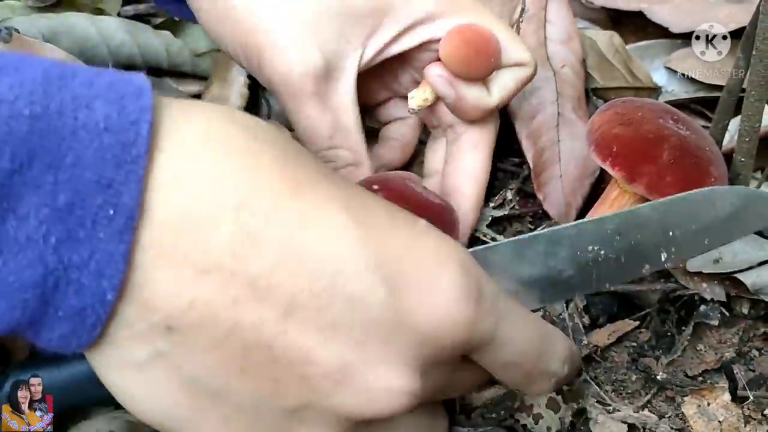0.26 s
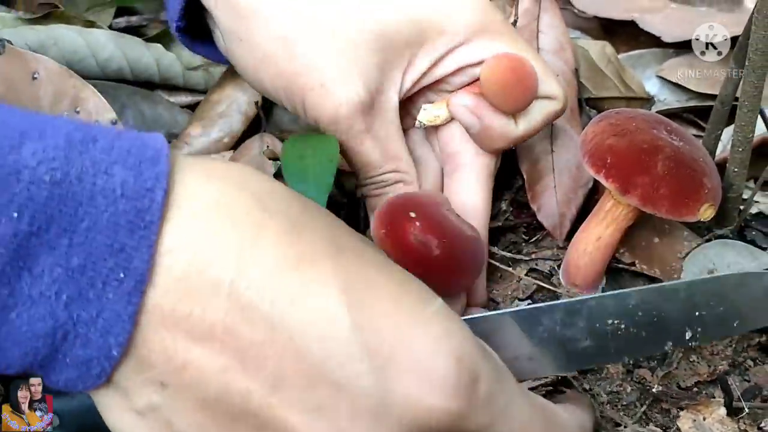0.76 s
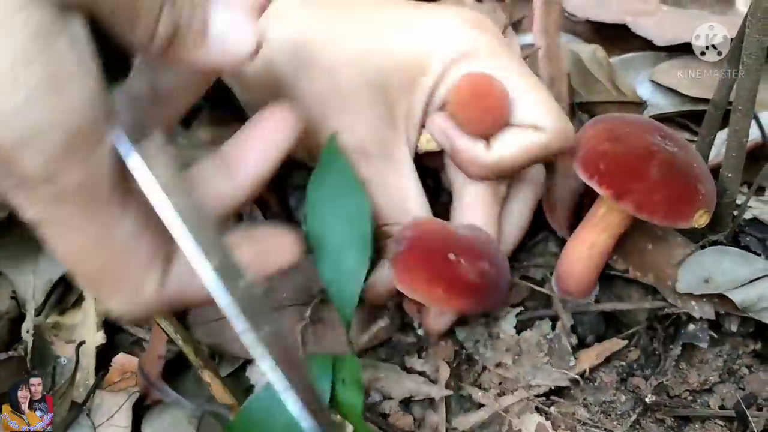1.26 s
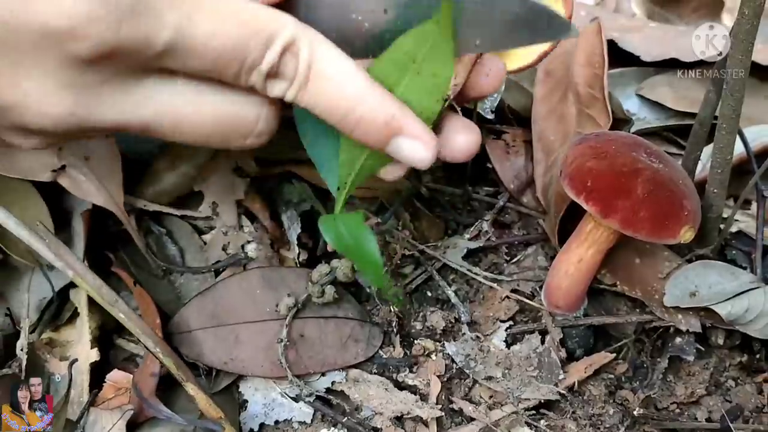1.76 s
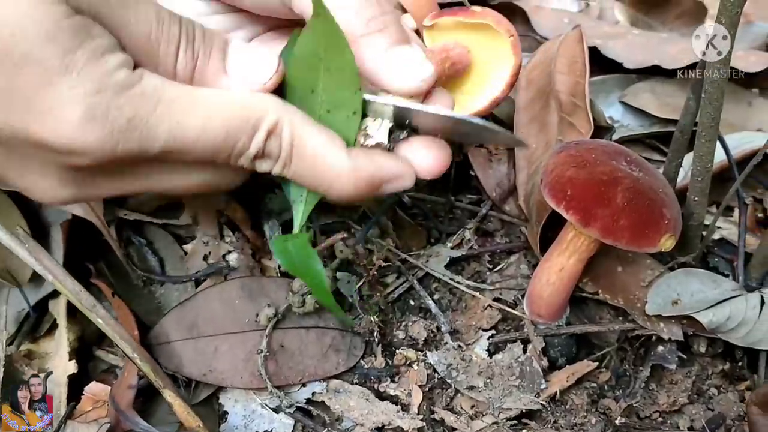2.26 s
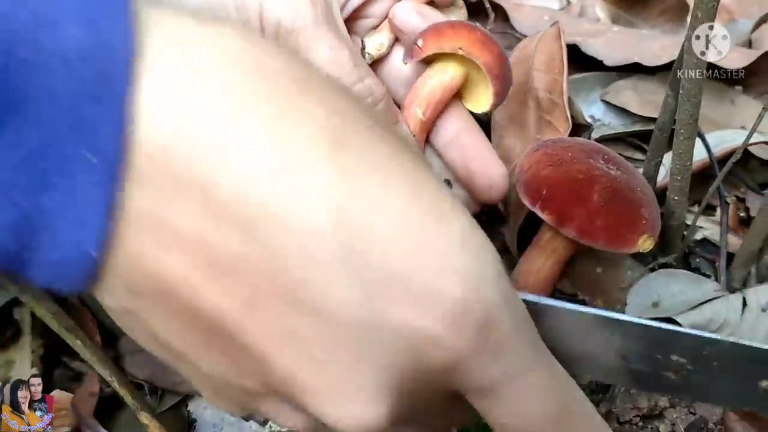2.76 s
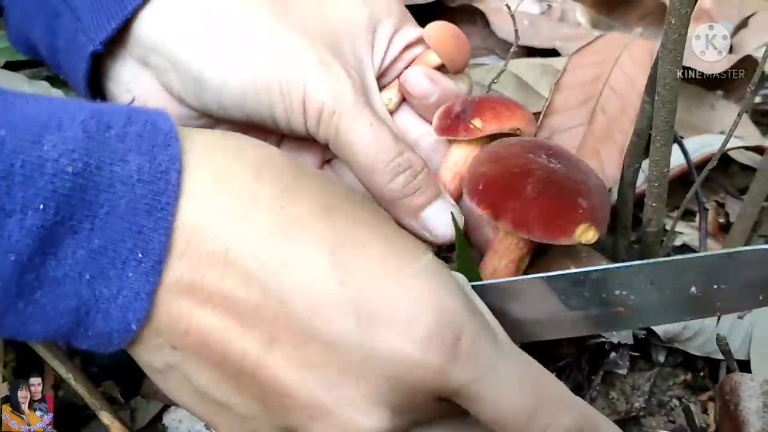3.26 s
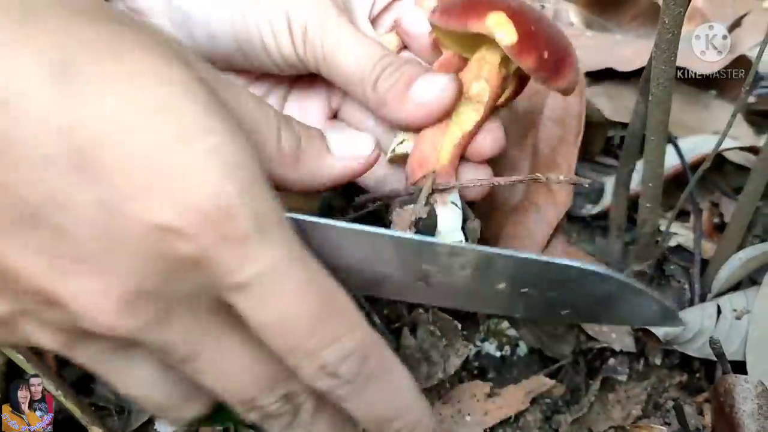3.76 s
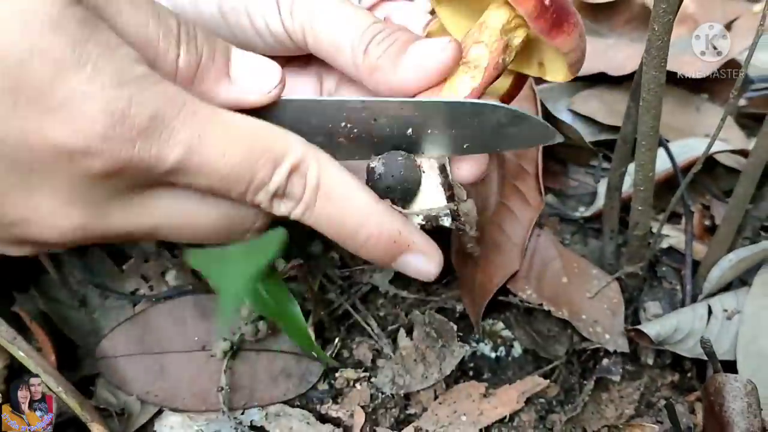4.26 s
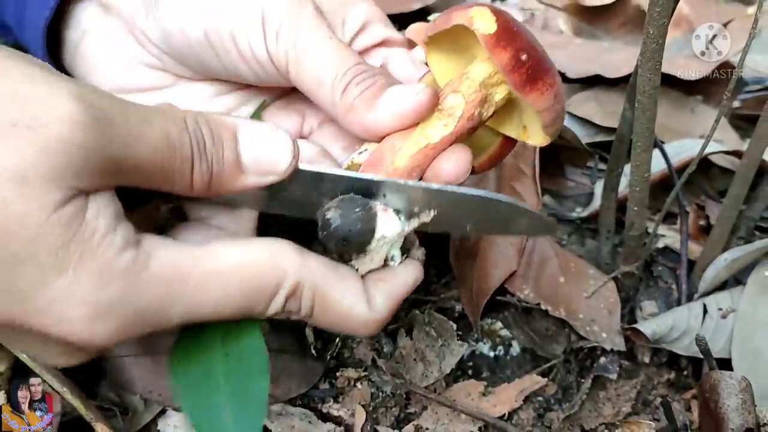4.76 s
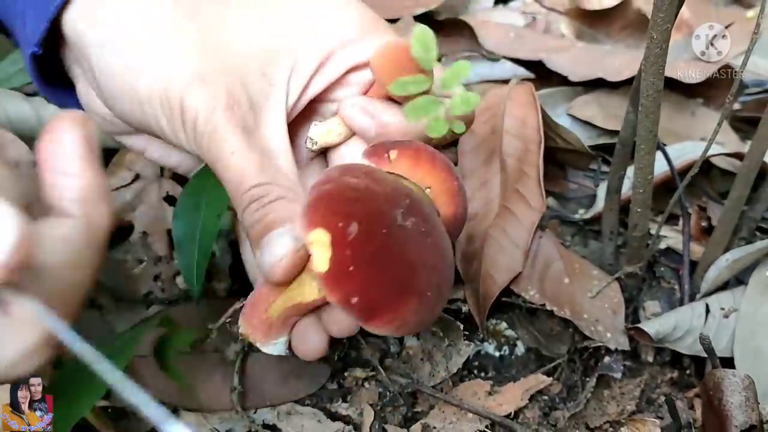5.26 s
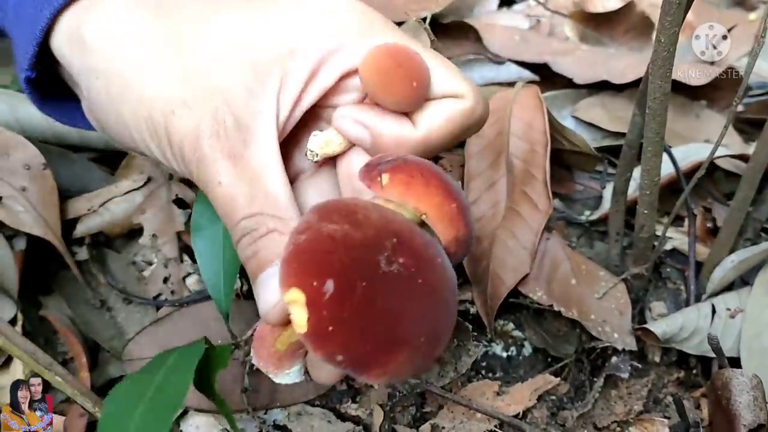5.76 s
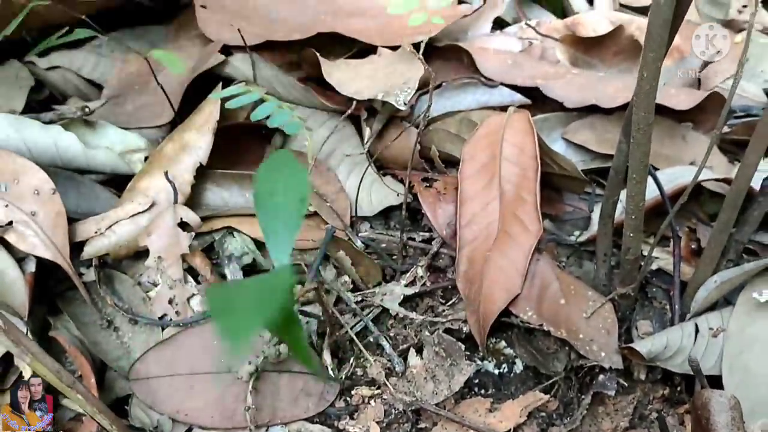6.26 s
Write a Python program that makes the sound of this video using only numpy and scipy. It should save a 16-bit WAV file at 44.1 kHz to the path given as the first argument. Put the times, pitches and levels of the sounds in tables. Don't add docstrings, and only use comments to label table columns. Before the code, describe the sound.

Very close stereo sound of hands and a knife working in dry forest litter. Irregular rustles, short scraping drags, brittle leaf cracks, stem ticks and small dull knocks come in busy clusters with short lulls. A bird whistles midway through the first half, echoing among the trunks. Soft forest hush and a narrow, high insect hiss continue behind, left exposed at the end.

```python
import sys
import numpy as np
from scipy import signal
from scipy.fft import rfft, irfft, dct
from scipy.io import wavfile
from scipy.ndimage import uniform_filter1d

SR = 44100
rng = np.random.default_rng(int(sys.argv[2]) if len(sys.argv) > 2 else 0)


def wav_out(sig):
    wavfile.write(sys.argv[1], SR, np.round(np.clip(np.atleast_2d(sig).T, -1, 1) * 32767).astype(np.int16))


def undo_db(level):
    steps = np.asarray(level, float) / 20
    return 10 ** steps


N = 286650
COARSE_S = np.arange(0, N, 16) / SR
SNAP_PEAK = 150


def time_curves(rows):
    s, *columns = np.transpose(rows)
    return [np.interp(np.arange(N) / SR, s, c) for c in columns]


def at_hz(points, hz):
    point_hz, level_db = np.transpose(points)
    return np.interp(np.log(hz), np.log(point_hz), level_db)


def rms_one(x):
    return x / np.sqrt(np.mean(x ** 2) + 1e-20)


def drift(rate_hz):
    r = np.exp(-32 * np.pi * rate_hz / SR)
    white = rng.standard_normal(N // 16 + 2002)
    slow = signal.lfilter([1], [1, -2 * r, r * r], white)[2000:]
    return np.interp(np.arange(N) / 16, np.arange(len(slow)), rms_one(slow))


def later(x, s):
    return np.interp(np.arange(N) - s * SR, np.arange(N), x, left=0)


def band(x, low_hz, high_hz):
    sos = signal.butter(2, [low_hz, min(high_hz, SR / 2.2)], "band", fs=SR, output="sos")
    return signal.sosfilt(sos, x)


# (frequency [Hz], left-right [dB])
PORT_TILT = [(60, -1), (110, 3), (200, 1), (380, 7.5), (700, -2), (1290, 0), (2380, -1.5), (4400, -4),
             (8120, -0.5), (15000, 8)]


def port_gains(hz):
    tilt = at_hz(PORT_TILT, hz) / 2
    return undo_db([[tilt], [-tilt]])


# (frequency [Hz], density [dB per Hz])
HUSH_SPECTRUM = [(12, -37), (20, 2.5), (55, -1.5), (116, -17), (172, -2), (301, -18.5), (1220, -16),
                 (2080, -7.5), (3160, -20.5), (4540, -12), (6180, -47), (6720, -19), (8180, -22),
                 (13900, -30.5), (16000, -61)]
HUSH_DB = -59.5


def forest_hush():
    edges = 20 * 2 ** (np.arange(20) / 2)
    white = rng.standard_normal((2, 2, N))
    out = 0
    for k, (low, high) in enumerate(zip(edges, edges[1:])):
        hz = np.sqrt(low * high)
        gain = undo_db(at_hz(HUSH_SPECTRUM, hz) + drift(9))
        out = out + band(white[k % 2], low, high) * gain * port_gains(hz)
    return undo_db(HUSH_DB) * rms_one(out)


# (time [s], level [dB])
CHORUS_LEVEL = [(0.0, -54.5), (0.7, -57.5), (1.27, -49.5), (2.03, -56), (3.24, -52), (3.95, -51),
                (4.29, -57), (4.98, -52.5), (5.25, -54.5), (6.5, -56)]


def insects(low_hz, high_hz):
    hiss = band(rng.standard_normal((2, N)), low_hz, high_hz)
    hiss = band(hiss, low_hz / 1.12, high_hz * 1.1)
    shimmer_db = 1.0 * drift(27) + 1.1 * drift(2.4)
    sides_db = np.array([[.5], [3.]])
    return rms_one(hiss) * undo_db(time_curves(CHORUS_LEVEL)[0] + shimmer_db + sides_db)


# (time [s], delay of the right port [ms])
HAND_PLACE = [(0, .48), (.5, .32), (1.4, .34), (1.7, .54), (2.6, .54), (2.85, .3), (3.9, .33), (4.3, .16),
              (4.9, .16), (5.2, .37), (6.5, .5)]


def port_lag_s():
    return time_curves(HAND_PLACE)[0] / 1000


# (frequency [Hz], density [dB per Hz])
LEAF_SPECTRUM = [(29, -49), (50, -16.5), (282, -10.5), (375, -9.5), (1050, -3), (1440, -7.5), (2110, 2.5),
                 (2890, -1.5), (3950, 4), (4780, -2.5), (5660, 0), (8110, -15), (14100, -22), (15500, -34)]


def colour_db(hz, thud_db, crisp_db):
    low = np.clip(np.log2(1800 / hz), 0, 1)
    high = np.clip(3 * np.log2(hz / 6500), 0, 1)
    return at_hz(LEAF_SPECTRUM, hz) + low * thud_db + high * crisp_db


# (time [s], rustle level [dB])
RUSTLE_LEVEL = [(0, -54.5), (.12, -53), (.47, -46), (.56, -52.5), (.9, -51), (1.21, -48), (1.39, -49.5),
                (1.7, -52.5), (2.19, -60.5), (2.46, -47.5), (3.3, -49.5), (3.66, -49.5), (4.1, -46.5),
                (4.29, -68.5), (5.0, -62.5), (5.67, -58.5), (5.97, -60), (6.5, -56.5)]
RUSTLE_THUD_DB, RUSTLE_CRISP_DB = -12, -12


def rustle_power(hz):
    busy = undo_db(2 * np.interp(COARSE_S, *np.transpose(RUSTLE_LEVEL)))
    return busy * undo_db(2 * colour_db(hz, RUSTLE_THUD_DB + 14.5, RUSTLE_CRISP_DB + 16.5))


# (start [s], length [s], level [dB], relative thud [dB], relative crispness [dB])
DRAG_STROKES = [(.01, 0.055, -47, -21, -5.5), (1.032, 0.03, -39, -19.5, -2.5),
                (1.089, 0.087, -44, -13.5, -3.5), (1.405, 0.185, -42, -14, -9.5),
                (3.198, 0.11, -46, -15.5, -14), (3.468, 0.028, -51, -3.5, -26),
                (3.846, 0.055, -44.5, -10, -5), (4.012, 0.067, -49, -21, -8),
                (4.338, 0.03, -51, -17.5, -17), (5.157, 0.217, -47.5, -12, -8.5),
                (5.274, 0.022, -42.5, -10.5, -18), (5.38, 0.021, -41.5, -15.5, -7),
                (5.432, 0.012, -41, -17.5, -2), (5.464, 0.088, -47, -15, -9), (5.607, 0.02, -55, -8, -7),
                (0.823, 0.028, -45, -28, -6.5), (5.072, .1, -57.5, -19, -9), (1.34, 0.016, -50.5, -6, -3),
                (0.99, 0.006, -43.5, -21, -1), (3.894, 0.037, -45, -17, -9.5),
                (5.567, 0.021, -36.5, -16, -12.5), (5.995, 0.2, -55.5, -28, -5.5),
                (2.466, .025, -38, -20, -11), (4.85, .05, -60, -29, -2), (3.7, .04, -51.5, -20, -12),
                (2.93, 0.084, -55, -27, -2.5), (4.71, .04, -57.5, -25, -8)]
STROKE_ATTACK_S, STROKE_RELEASE_S = 0.0052, 0.028


def stroke_power(hz):
    start, length, level_db, thud_db, crisp_db = np.transpose(DRAG_STROKES)
    since = COARSE_S - start[:, None]
    rise = np.clip(since / STROKE_ATTACK_S, 0, 1)
    after = np.clip(since - length[:, None], 0, 1)
    dragging = (rise * np.exp(-after / STROKE_RELEASE_S)) ** 2
    return undo_db(2 * (level_db + colour_db(hz, thud_db + 17.5, crisp_db + 14))) @ dragging


# (start [s], length [s], level [dB])
HAND_RESTS = [(.2, .035, -3), (0.448, .01, -7.5), (0.499, 0.027, -3), (0.592, .018, -7), (.745, .04, -4.5),
              (0.794, 0.018, -4), (.865, .02, -6), (.982, 0.016, -5), (1.018, .015, -8), (1.595, .005, -10),
              (1.605, 0.048, -5.5), (1.424, .01, -5), (1.5, .015, -4), (.905, .045, -4), (2.495, .025, -4),
              (1.675, .02, -5), (2.092, 0.075, -4), (2.876, 0.018, -5), (3.446, .028, -5),
              (3.632, 0.06, -7), (4.432, 0.21, -6), (5.364, 0.013, -6), (5.647, .03, -6), (5.7, .04, -3.5)]
REST_EDGE_S = 0.0046


def rests():
    e = REST_EDGE_S / 2
    total_db = 0
    for s, length, db in HAND_RESTS:
        corners = [s - e, s + e, s + e + length, s + 3 * e + length]
        total_db = total_db + np.interp(COARSE_S, corners, [0, db, db, 0])
    return undo_db(2 * total_db)


# (time [s], frequency [Hz])
LITTER_RING = [(0, 4030), (.9, 3940), (1.1, 3630), (1.35, 4350), (1.47, 3020), (1.58, 4320), (2.3, 4260),
               (3.0, 3800), (3.3, 3660), (3.9, 4200), (4.2, 4070), (5.1, 2760), (5.45, 2420), (5.65, 2570),
               (6.0, 4050)]
LITTER_DB, LITTER_OCTAVES = 3, .4


def litter_db(hz):
    centre = np.log2(time_curves(LITTER_RING)[0])
    near = np.exp(-((np.log2(hz) - centre) / LITTER_OCTAVES) ** 2)
    return LITTER_DB * (near - .4)


# (time [s], peak level [dB], ringing [Hz], left-right [dB])
SOIL_KNOCKS = [(0.2906, -28.5, 4700, 5.5), (0.3737, -25, 3880, 0), (0.4589, -24, 3770, -5),
               (0.614, -35, 1480, -3), (0.6593, -32, 4500, 0), (0.737, -24, 3220, -5),
               (0.8474, -28, 3400, -5), (0.9587, -29, 1640, -7), (1.0325, -22, 3200, 8),
               (1.411, -21.5, 2290, -4.5), (1.5911, -28, 3920, 10), (2.2015, -28, 4940, -9),
               (2.47, -20, 4320, 0), (3.85, -31, 2580, 2.5), (3.2069, -31, 3880, -16),
               (3.411, -32, 2000, -8), (3.4806, -34, 3170, -9), (3.488, -28, 3120, -8.5),
               (3.9433, -33, 3720, 9), (4.049, -34.5, 5630, 9.5), (4.366, -39, 4670, 4),
               (5.2225, -29.5, 3800, 0), (5.297, -30, 3470, 0.5), (5.447, -30.5, 2470, -2),
               (5.4938, -31.5, 2430, -4)]
LEAF_CRACKS = [(0.249, -30, 3320, 0), (0.3685, -27, 3280, -1), (0.443, -23.5, 4040, -2),
               (0.706, -43, 4300, -9), (0.976, -33, 3930, -7.5), (1.05, -31.5, 3660, -8),
               (1.156, -27, 2130, 1.5), (2.247, -34, 4970, -4), (1.602, -19.5, 4370, -2),
               (1.666, -27.5, 4500, -2), (1.997, -30, 4100, -4), (2.0413, -29, 3800, -6.5),
               (2.1978, -27, 4200, -4.5), (2.3033, -27, 4870, 0), (2.399, -29.5, 5700, -5),
               (2.4659, -12.5, 4640, -5.5), (1.965, -37.5, 4540, -3), (2.338, -38, 5500, -10),
               (2.989, -33.5, 4640, -10), (3.106, -25, 4760, -10.5), (3.545, -28, 3840, -14.5),
               (3.616, -29.5, 4540, -10.5), (4.1127, -34.5, 5570, -6), (4.734, -37.5, 5650, -10),
               (4.976, -36, 2480, -6.5), (5.1165, -36.5, 4230, -4), (5.392, -31, 2600, -6),
               (5.5751, -18.5, 1720, -8), (5.854, -37, 6300, -7), (0.547, -41, 4470, -13)]
STEM_TICKS = [(.789, -25.5, 3740, -12.5), (.8583, -30.5, 2790, -2), (0.893, -22.5, 3940, -0.5),
              (1.013, -37.5, 4220, 16), (1.067, -31, 3670, 5), (1.4199, -19.5, 4530, -1),
              (1.4386, -31, 3400, -8), (1.4643, -23.5, 3600, 2), (1.477, -24, 3600, -10.5),
              (1.5566, -33, 4100, 8), (2.4735, -24.5, 4850, 1), (2.4845, -23, 4050, -24.5),
              (2.8701, -17, 4300, -3), (3.233, -36.5, 4120, -17), (3.2913, -28, 3500, -5.5),
              (3.695, -30, 4170, -12), (3.9076, -29, 4350, 4), (5.406, -15, 2990, -6.5),
              (5.5785, -17, 2140, -1.5), (5.586, -34, 4150, 16), (5.61, -34, 4370, -11),
              (5.6775, -29, 2500, -6.5), (6.199, -52, 3470, -3), (3.519, -14.5, 3240, -4),
              (5.695, -23.5, 3350, -6), (3.279, -29.5, 4100, 1), (3.912, -31, 3630, -13),
              (4.889, -41, 3060, -11), (1.921, -31.5, 5650, -0.5), (2.271, -36, 3600, 4.5)]
SMALL_SPLINTERS = [(0.012, -31.5, 3630, 8), (0.0364, -30, 3800, -4), (0.045, -29.5, 3600, 1),
                   (0.0732, -33, 4360, -1), (0.2833, -33.5, 3390, -2), (0.642, -43, 4400, 0),
                   (0.6582, -31.5, 5020, -6), (1.0047, -27.5, 3800, 1), (1.257, -32, 5500, -3),
                   (1.3522, -32, 4500, -3.5), (1.441, -26.5, 3670, 1), (1.52, -30, 5070, 2),
                   (1.564, -28.5, 5400, -5), (1.5724, -27.5, 3660, 2.5), (1.7215, -37, 3800, 7),
                   (2.1686, -43, 3630, 2), (2.185, -34.5, 5600, 1), (2.884, -35.5, 3160, -3),
                   (2.9444, -35.5, 4570, -7), (3.4769, -28.5, 3270, -3), (3.579, -37.5, 4570, -8),
                   (3.89, -34, 4620, 2), (4.109, -35, 3820, -2), (4.9824, -37.5, 4060, -2),
                   (5.2807, -33, 2210, -2), (5.291, -30.5, 3210, -2.5), (5.4144, -30.5, 2430, -0.5),
                   (5.6214, -34, 2370, 0.0), (5.6345, -31.5, 4360, 4.5), (6.3274, -48, 4570, 4),
                   (6.4686, -46, 4370, -3), (2.0768, -38.5, 4500, -1), (2.2793, -38, 5500, 0),
                   (2.3166, -40, 5000, 0), (2.9699, -34, 4000, -5), (3.0219, -36, 4000, -5),
                   (3.0573, -35.5, 4460, -5), (3.5324, -33, 4000, -5), (3.749, -34, 3000, 0),
                   (4.342, -43, 4500, 1), (1.055, -29, 3000, 1), (1.127, -31, 4200, 0),
                   (1.916, -36, 5500, 0), (2.058, -40.5, 5000, 0), (2.456, -31.5, 5200, 1),
                   (5.9798, -41, 4500, -1), (2.006, -40, 4500, 1)]
# (relative thud [dB], relative crispness [dB])
KIND_COLOURS = [
    (-26, -13.5),
    (-34.5, -9.5),
    (-32, -22),
    (-35.5, -15),
]


def snaps():
    kinds = [SOIL_KNOCKS, LEAF_CRACKS, STEM_TICKS, SMALL_SPLINTERS]
    rows = [(*row, *colour) for events, colour in zip(kinds, KIND_COLOURS) for row in events]
    return np.transpose(rows)


def bursts(count, rise_s, fall_s, crack, tail_db, tail_s):
    t = (np.arange(640) - SNAP_PEAK) / SR
    noise = rng.standard_normal((count, 2, len(t)))
    dying = np.exp(-t / fall_s) + undo_db(tail_db) * np.exp(-t / tail_s)
    shape = np.where(t < 0, np.exp(t / rise_s), dying)
    snap = noise * shape + crack * (t == 0) * np.sign(noise)
    lines = rfft(snap)
    power = uniform_filter1d(abs(lines) ** 2, size=15, axis=2)
    snap = irfft(lines / np.sqrt(power), len(t))
    return snap / np.sqrt(np.sum(snap ** 2, axis=2, keepdims=True))


def snap_gains(hz, peak_db, ring_hz, thud_db, crisp_db, ring_db, uneven_db):
    level_db = colour_db(hz, thud_db[:, None] + 32.5, crisp_db[:, None] + 21.5)
    level_db = level_db + ring_db * np.exp(-(np.log2(hz / ring_hz[:, None]) / 0.47) ** 2)
    gain = undo_db(level_db + uneven_db * rng.standard_normal(level_db.shape))
    middle = np.sum(gain ** 2 * hz * (hz > 1500) * (hz < 7500), axis=1) / SR
    return gain * (undo_db(peak_db) / np.sqrt(middle))[:, None]


def grains(per_s, spread_db):
    sizes = undo_db(spread_db * np.minimum(rng.exponential(1, N), 5)) * rng.choice([-1, 1], N)
    return rms_one(sizes * (rng.random(N) < per_s / SR))


def leaves(alike, snap_db, ring_db, uneven_db):
    resting, lag_s = rests(), port_lag_s()
    clumps = undo_db(1.2 * drift(35) + 2.8 * drift(200))
    cracks = np.array([grains(1600 * clumps, spread_db=2.2) for _ in range(2)])
    brush = rng.standard_normal((2, 2, N)) * rms_one(clumps)
    edges = 79 * 2 ** (np.arange(24) / 3)
    hz = np.sqrt(edges[1:] * edges[:-1])
    s, peak_db, ring_hz, pan_db, thud_db, crisp_db = snaps()
    splinters = bursts(len(s), rise_s=.0009, fall_s=.0015, crack=2.8, tail_db=-21, tail_s=.005)
    snap = snap_gains(hz, peak_db + snap_db, ring_hz, thud_db, crisp_db, ring_db, uneven_db)
    at = (s * SR).astype(int) - SNAP_PEAK
    lean = undo_db(np.array([pan_db + 4, -pan_db - 4]) / 2)
    patches, flicker = drift(20), drift(80)
    out = np.zeros((2, N))
    for k, (low, high) in enumerate(zip(edges, edges[1:])):
        patch_db = 2.6 * np.roll(patches, 12011 * k) + 2.8 * np.roll(flicker, 12007 * k)
        patch_db += litter_db(hz[k])
        power = (rustle_power(hz[k]) + stroke_power(hz[k])) * resting
        gain = np.interp(np.arange(N) / SR, COARSE_S, np.sqrt(power)) * undo_db(9 + patch_db)
        left, scattered = gain * (.65 * cracks + .6 * brush[k % 2])
        right = left.copy()
        for i, g, (to_left, to_right), (first, second) in zip(at, snap[:, k], lean.T, splinters):
            span = slice(i, i + len(first))
            left[span] += g * to_left * first
            right[span] += g * to_right * first
            scattered[span] += g * to_right * second
        same = np.clip(alike + 0.27 * np.log2(1000 / hz[k]), .1, .99)
        right = later(same * right + np.sqrt(1 - same ** 2) * scattered, lag_s)
        there = band([left, right], low, high)
        out += band(there[:, ::-1], low, high)[:, ::-1] * port_gains(hz[k])
    return out


# (time [s], peak level [dB], frequency [Hz], left-right [dB])
DULL_KNOCKS = [(0.02, -34.5, 900, -7.5), (0.087, -42.5, 815, 5), (0.192, -50, 736, -1),
               (0.281, -39.5, 670, 5), (0.295, -31, 1110, -5), (0.372, -39, 594, -1), (0.411, -42, 895, 9),
               (0.475, -41, 500, -1), (0.552, -42, 674, 1), (0.607, -41, 1100, 1), (0.656, -41.5, 583, -1),
               (0.733, -41, 1110, -6), (0.842, -40.5, 830, -8.5), (0.955, -40, 720, 3),
               (1.03, -25.5, 1210, 14.5), (1.165, -36.5, 1040, 2), (1.276, -39, 422, -1),
               (1.395, -45, 606, 1.0), (1.409, -36, 604, 2), (1.419, -28.5, 1120, 14),
               (1.589, -31.5, 1090, 19), (1.969, -51, 1020, 14), (2.039, -51.5, 394, 9),
               (2.076, -45, 824, 14), (2.2, -42, 845, 18), (2.301, -41, 904, -8), (2.463, -34.5, 637, 10),
               (2.491, -37.5, 446, 0.5), (2.525, -32, 795, 6.5), (2.472, -46, 110, 2),
               (2.748, -45, 1130, -14), (2.798, -46.5, 590, 4), (2.869, -30, 1000, 6),
               (3.206, -36.5, 620, 3), (3.303, -44, 840, -1), (3.409, -33.5, 1130, 12),
               (3.435, -46, 420, -1), (3.475, -40, 760, -5), (3.485, -32.5, 980, 13),
               (3.518, -28.5, 756, 1.5), (3.73, -48, 630, 4), (3.745, -39, 1150, -9), (3.843, -30, 690, 1),
               (3.86, -40, 1140, -2), (3.905, -45, 1020, 2.0), (4.091, -46.5, 420, 5), (5.228, -43, 802, 0),
               (5.294, -32, 765, -8), (5.576, -52, 308, -1), (5.693, -40, 1080, -16)]
THUD_DB, THUD_CYCLES, THUD_RISE_S, THUD_ROUGH = -1.0, 4.14, .0006, .4


def thuds():
    out = np.zeros((2, N + SR))
    t = np.arange(1300) / SR
    lag_s = port_lag_s()
    chances = rng.random((len(DULL_KNOCKS), 2))
    for (s, db, hz, pan_db), (turn, ratio) in zip(DULL_KNOCKS, chances):
        i = int(s * SR)
        for side, lean_db in enumerate([pan_db / 2, -pan_db / 2]):
            late = np.maximum(t - side * lag_s[i], 0)
            rough = np.sin(2 * np.pi * (hz * (0.94 + ratio) * late + turn))
            tone = np.sin(2 * np.pi * hz * late) + THUD_ROUGH * rough
            dying = undo_db(-60 * late * hz / (3 * THUD_CYCLES))
            shape = (1 - np.exp(-late / THUD_RISE_S)) * dying
            out[side, i:i + len(t)] += undo_db(db + THUD_DB + 4 + lean_db) * shape * tone
    return out[:, :N]


# (time [s], frequency [Hz], level [dB])
BIRD_NOTES = [
    [(2.365, 1874, -72), (2.379, 1986, -45), (2.45, 2035, -44), (2.49, 2040, -47)],
    [(2.408, 2500, -49), (2.424, 2620, -43), (2.46, 2780, -43)],
    [(2.558, 3420, -48.5), (2.567, 3374, -39.5), (2.589, 3335, -36.5), (2.607, 2960, -36.5),
     (2.619, 2905, -39.5), (2.637, 3690, -36), (2.651, 3950, -37), (2.681, 3394, -40.5), (2.69, 3286, -51)],
    [(2.695, 2560, -46), (2.722, 2530, -45.5), (2.745, 2530, -53)],
    [(2.385, 1018, -71), (2.46, 1014, -66)],
]
# (time [s], frequency [Hz], level [dB])
DEEP_CHIRP = [
    (5.05, 2155, -55),
    (5.075, 2350, -53),
    (5.1, 2950, -52),
    (5.135, 3100, -52),
    (5.18, 3115, -57),
]
# (time [s], frequency [Hz], level [dB])
FAR_PIPS = [
    (4.57, 2040, -57),
    (4.617, 2010, -55),
    (4.712, 2090, -53.5),
]
CHIRP_FLUTTER_DB, CHIRP_WET_DB = 3, 3
BIRD_LAG_S = 0.00043


def birds(echo_db, echo_t60_s):
    t, song, flutter = np.arange(N) / SR, np.zeros(N), drift(60)
    pips = [[(s, hz * 1.05, db), (s + 0.013, hz * .94, db - 7.5)] for s, hz, db in FAR_PIPS]
    for note in [*BIRD_NOTES, *pips]:
        hz, level_db = time_curves(note)
        edge = np.clip(np.minimum(t - note[0][0], note[-1][0] - t) / 0.0053 + .5, 0, 1)
        loudness = np.sqrt(2) * undo_db(level_db + 1.2 * flutter) * edge
        song += loudness * np.sin(2 * np.pi * np.cumsum(hz) / SR)
    hz, level_db = time_curves(DEEP_CHIRP)
    sounding = (t > DEEP_CHIRP[0][0]) * (t < DEEP_CHIRP[-1][0])
    loudness = undo_db(level_db + CHIRP_FLUTTER_DB * flutter) * sounding
    chirp = loudness * np.sin(2 * np.pi * np.cumsum(hz) / SR)
    wet = song + undo_db(CHIRP_WET_DB) * chirp
    song = song + chirp
    lag = t[:SR // 2]
    trunks = rng.standard_normal((2, len(lag))) * undo_db(-60 * lag / echo_t60_s) * (lag > .008)
    trunks = trunks / np.sqrt(np.sum(trunks ** 2) / 2)
    echoes = signal.fftconvolve(wet[None], trunks, axes=1)[:, :N]
    direct = np.array([undo_db(-10.0) * song, undo_db(5.5) * later(song, BIRD_LAG_S)])
    return direct + undo_db(echo_db) * echoes


def scene():
    near = leaves(alike=0.68, snap_db=19.0, ring_db=10, uneven_db=2.5) + thuds()
    far = forest_hush() + insects(low_hz=4050, high_hz=5000)
    return near + far + birds(echo_db=-2.5, echo_t60_s=.75)


# (frequency [Hz], signal over step [dB])
BAND_FINENESS = [(300, 18), (1500, 1), (3500, -2.5), (5200, -4.5), (7000, -7), (14000, -9),
                 (15200, -12), (15900, -24)]
# (frequency [Hz], level [dB])
SMALLEST_STEP = [(9000, -85), (12000, -74), (14000, -69), (15500, -62)]


def thinned(x, wander_db, attack_db):
    count = N // 1024 + 2
    mid_side = np.pad([x[0] + x[1], x[0] - x[1]], [(0, 0), (644, count * 1024 + 380 - N)])
    window = signal.windows.kaiser_bessel_derived(2048, 4 * np.pi)
    blocks = mid_side[:, np.arange(count)[:, None] * 1024 + np.arange(2048)] * window
    a, b, c, d = np.split(blocks, 4, axis=2)
    folded = np.dstack([-c[..., ::-1] - d, a - b[..., ::-1]])
    lines = dct(folded, 4, norm="ortho").reshape(2, count, 64, 16)
    hz = (np.arange(64) + .5) * SR / 128
    wander = uniform_filter1d(rng.standard_normal((2, count, 64)), 3, axis=1)
    step = np.sqrt(np.mean(lines ** 2, axis=3))
    step = step * undo_db(wander_db * wander - at_hz(BAND_FINENESS, hz))
    treble = np.diff(blocks[0], prepend=0).reshape(count, 16, 128)
    power = np.mean(treble ** 2, axis=2)
    attack = power.max(axis=1) > undo_db(2 * attack_db) * np.median(power, axis=1)
    step = step * np.where(attack[:, None] & (hz < 14800), .25, 1)
    step = np.maximum(step, undo_db(at_hz(SMALLEST_STEP, hz)))[..., None]
    lines = np.sign(lines) * np.floor(abs(lines) / step + .4) * step
    u, v = np.split(dct(lines.reshape(2, count, 1024), 4, norm="ortho"), 2, axis=2)
    blocks = np.dstack([v, -v[..., ::-1], -u[..., ::-1], -u]) * window
    joined = blocks[:, 1:, :1024] + blocks[:, :-1, 1024:]
    mid, side = joined.reshape(2, -1)[:, :N - 380]
    return np.hstack([x[:, :380], np.array([mid + side, mid - side]) / 2])


def roll_off(x):
    return signal.sosfilt(signal.butter(12, 16500, fs=SR, output="sos"), x)


def record(dry):
    mix = thinned(dry, wander_db=8.5, attack_db=10.0)
    return roll_off(mix)


dry = scene()
out = record(dry)
wav_out(out)
```